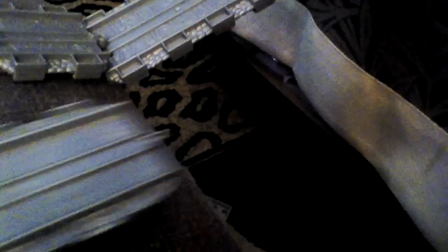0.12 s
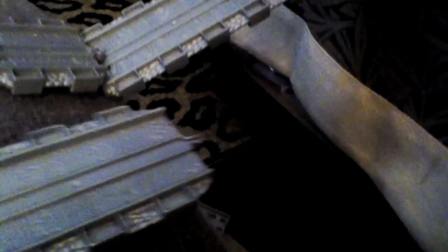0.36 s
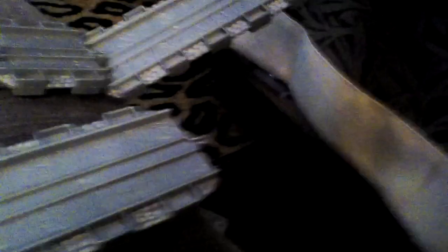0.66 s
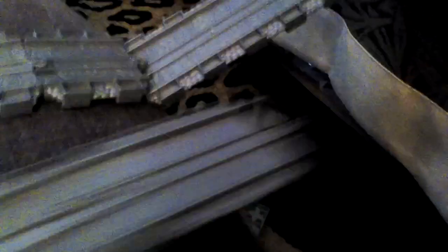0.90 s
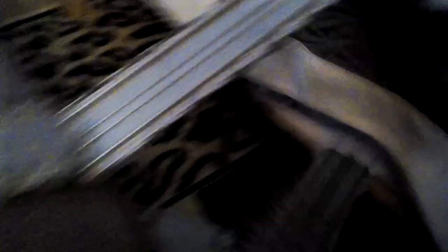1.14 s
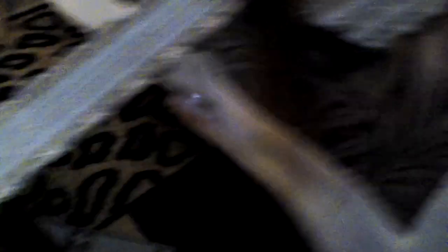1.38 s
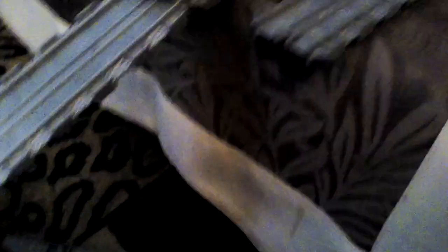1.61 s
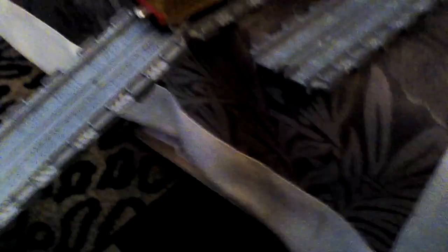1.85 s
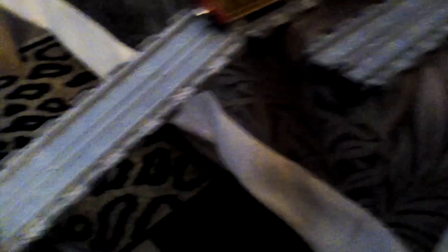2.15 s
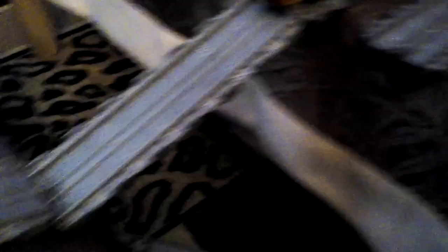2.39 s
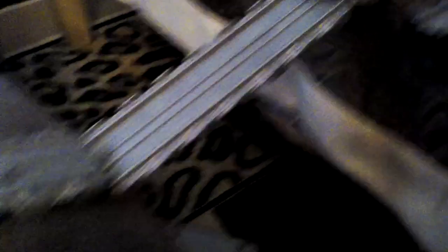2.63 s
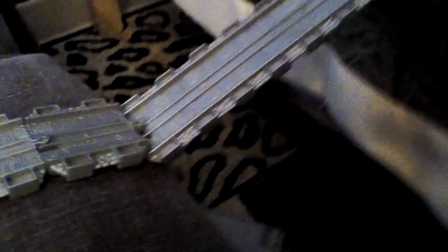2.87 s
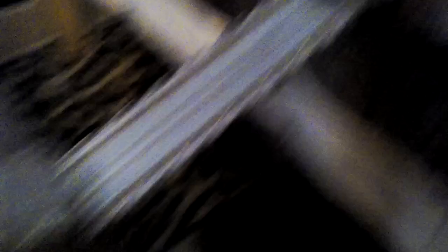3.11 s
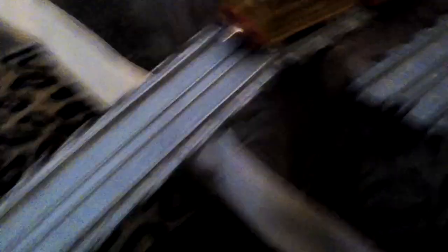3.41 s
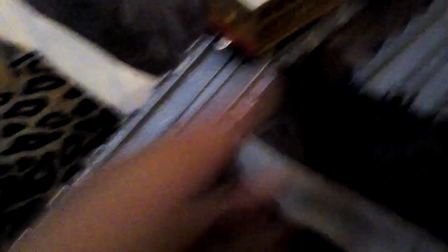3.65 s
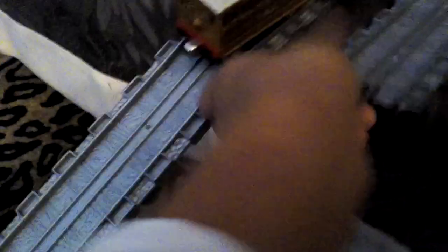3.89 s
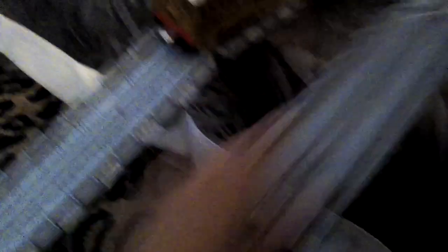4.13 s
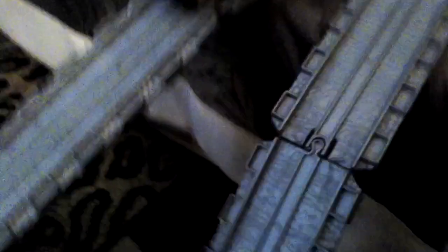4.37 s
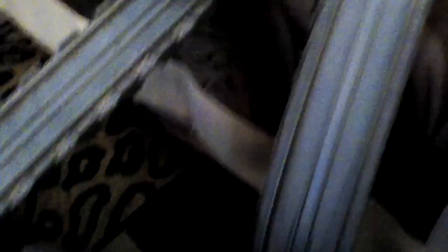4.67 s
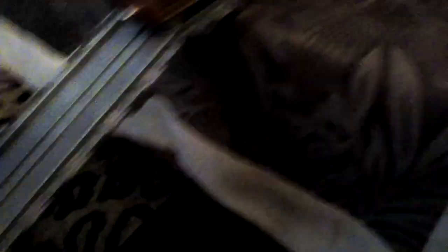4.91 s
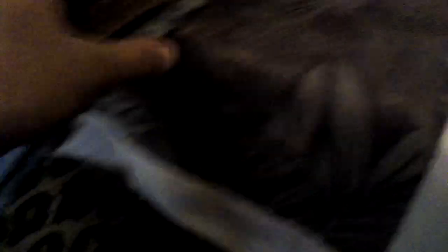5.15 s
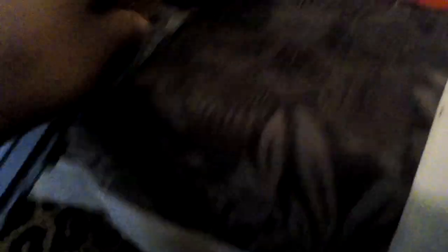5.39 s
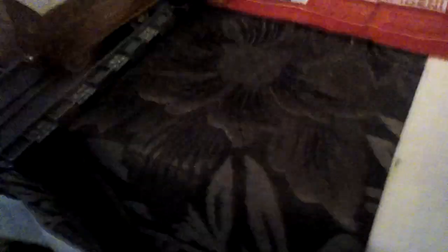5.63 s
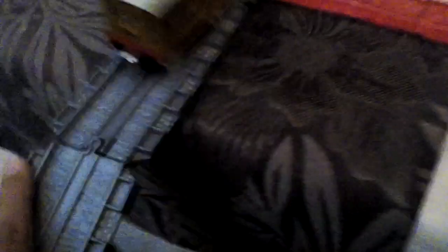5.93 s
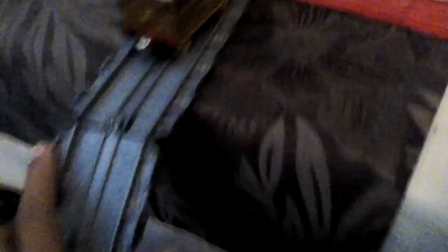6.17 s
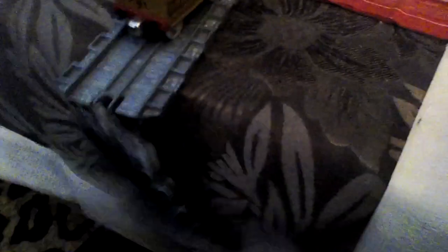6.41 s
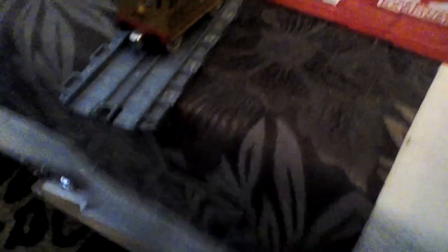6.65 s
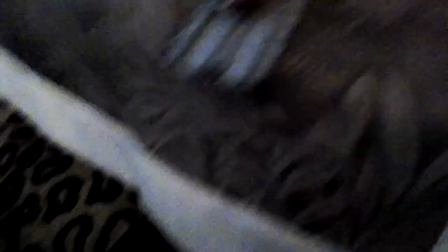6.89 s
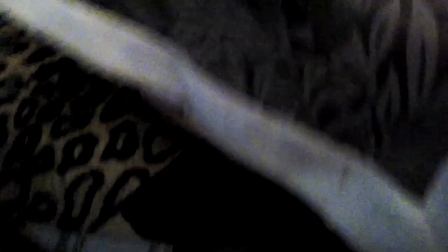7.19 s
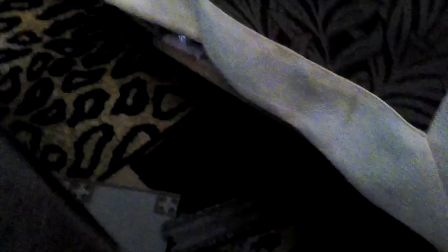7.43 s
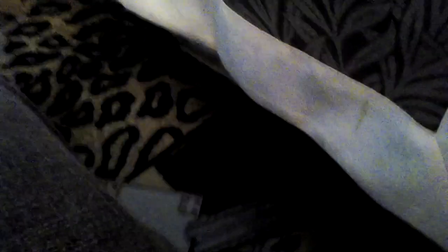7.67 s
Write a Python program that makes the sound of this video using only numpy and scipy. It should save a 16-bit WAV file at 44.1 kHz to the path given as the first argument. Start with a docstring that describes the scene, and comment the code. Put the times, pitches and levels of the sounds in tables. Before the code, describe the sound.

A small room, heard close on a cheap handheld microphone with a faint steady hiss and low rumble. The first second is almost still. Around 1.0 to 1.3 s a light scrape leads into a quick rattle of hard plastic, then a hollow, loud thud at 1.5 s and further knocks until 1.9 s. A lull follows, with only tiny bumps, until fingers scrape and thump the casing at 3.3 to 3.4 s. From 4 s hands and cloth rustle over the rug; a ribbed edge rasps at 4.2 s and a click comes at 4.9 s. A very heavy hollow landing hits at 5.0 s. At 5.4 to 5.6 s scraping ticks end in another thud and sharp clack. Scattered clicks follow around 6 s, knocks at 6.7 s, a bright loud snap at 7.0 s, then dense clatter from 7.2 s, thinning into small clicks over continuing rustle.

```python
"""A small room with a rug: plastic toy track pieces are pulled apart, knocked together and dropped near a
handheld device. Contacts and scrapes are noise and ticks that ring the track's modes; flat landings squeeze air.
Cloth and hands rustle over the rug as patchy coloured noise, with low swells of shifting weight and brief whistles.
Fingers scrape and bump the casing; the small microphone rings near 6 kHz and adds its own hiss."""
import sys
import numpy as np
from scipy import signal
from scipy.fft import rfft, irfft
from scipy.io import wavfile
from scipy.ndimage import uniform_filter1d, map_coordinates

SR = 44100
rng = np.random.default_rng(int(sys.argv[2]) if len(sys.argv) > 2 else 0)


def attenuation_scalar(level_db):
    """Turn a level in dB into a linear amplitude multiplier (20 dB per decade)."""
    decades = np.asarray(level_db, float) / 20
    return 10 ** decades


def store_pcm(level_fs):
    """Save levels as 16-bit WAV."""
    pcm = np.round(np.clip(level_fs, -1, 1) * 32767).astype(np.int16)
    wavfile.write(sys.argv[1], SR, np.atleast_2d(pcm).T)


N = 343539
SPAN = 16384  # samples kept of one hit and its room


def unit(x):
    """Normalisation to an rms of 1."""
    return x / np.sqrt(np.mean(x ** 2) + 1e-20)


def along(points, hz):
    """Linear interpolation of (frequency [Hz], value) points on a logarithmic frequency axis."""
    f, v = np.transpose(points)
    return np.interp(np.log(hz + 1), np.log(f + 1), v)


def causal(db):
    """Minimum-phase response: folding the cepstrum gives the dB curve on an FFT grid its causal phase."""
    ceps = irfft(np.log(attenuation_scalar(db)))
    half = len(ceps) // 2
    ceps[1:half] *= 2
    ceps[half + 1:] = 0
    return np.exp(rfft(ceps))


def add(track, s, sound):
    """Superposition: mixes a sound into the track from time s."""
    part = track[round(s * SR):][:len(sound)]
    part += sound[:len(part)]


def rush(spectrum, patchy_db, wide, long, size=512):
    """Filtered random noise of rms 1 whose gain varies in patches of wide bins by long frames."""
    hz, _, z = signal.stft(rng.standard_normal(N + size), SR, nperseg=size)
    field = uniform_filter1d(rng.standard_normal(z.shape), wide, 0)
    field = uniform_filter1d(field, long, 1)
    gain_db = along(spectrum, hz)[:, None] + patchy_db * unit(field)
    return unit(signal.istft(z * attenuation_scalar(gain_db), nperseg=size)[1][:N])


def hit_grid():
    """Discrete Fourier frequencies [Hz] of one hit."""
    return np.fft.rfftfreq(SPAN, 1 / SR)


# response of the small microphone: (frequency [Hz], gain [dB])
MICROPHONE = [(100, 0), (4000, -11), (5000, -3), (6300, 0), (7200, -12.5), (8200, -22), (10000, -31.5),
              (15000, -46.5), (16500, -45.5)]


def microphone(hz):
    """Transducer resonance: gain [dB] of the capsule at each frequency."""
    return along(MICROPHONE, hz)


# reverberation time of the room: (frequency [Hz], t60 [s])
REVERBERATION = [(100, 0.5), (300, 0.34), (700, 0.2), (2000, 0.27), (5000, 0.3), (13000, 0.15)]
# nominal reflections from ceiling and walls, varied at each hit: (delay [s], level [dB])
REFLECTIONS = [(0.0122, -12.5), (0.013, -18.5), (.0245, -34), (0.0342, -37)]


def room(hit, db, spread=None):
    """Reverberation: early reflections, and a fresh diffuse tail fed by what spreads in all directions."""
    hz, t, z = signal.stft(rng.standard_normal(SPAN), SR, nperseg=256)
    decay = attenuation_scalar(-60 * t / along(REVERBERATION, hz)[:, None])
    tail = signal.istft(z * decay, SR, nperseg=256)[1][:SPAN]
    tail = tail * np.clip(np.arange(SPAN) / SR / 0.013, 0, 1) ** 2  # the diffuse field builds up
    echoes = np.zeros(SPAN)
    for s, wall_db in REFLECTIONS:
        delay = round(s * SR) + rng.integers(0, 20)  # the path shifts from hit to hit
        echoes[delay] = attenuation_scalar(wall_db + rng.normal(0, 0.67))
    diffuse = signal.fftconvolve(hit if spread is None else spread, tail / np.linalg.norm(tail))
    reflected = signal.fftconvolve(hit, echoes)
    return hit + (reflected + attenuation_scalar(db) * diffuse)[:SPAN]


# modes of the plastic track: (frequency [Hz], bandwidth [Hz], relative gain [dB])
TRACK_MODES = [(964, 190, -8.5), (1140, 76, 2), (1540, 2000, -12.5), (2020, 100, -7), (2180, 810, -1),
               (2776, 100, 10.5), (3240, 580, 5.5), (4225, 210, 9.5), (5000, 3400, -9), (6500, 170, -7.5),
               (6674, 170, -4.5), (9140, 750, 10), (11200, 8700, -4.5)]


def ringing(hz, spread_db, favoured_hz=2300):
    """Modal superposition: modes vary in strength, and the struck spot favours those near one frequency."""
    modes = []
    for k, (centre, width, db) in enumerate(TRACK_MODES):
        resonance = 1j * hz * width / (centre * centre - hz * hz + 1j * hz * width)
        modes.append((-1) ** k * attenuation_scalar(db) * resonance)
    log_ratio = np.log(np.array(TRACK_MODES)[:, 0] / favoured_hz)
    boost_db = 15 * np.exp(-(log_ratio / 0.08) ** 2)
    strength = attenuation_scalar(boost_db + rng.normal(0, spread_db, len(modes)))
    return 0.9 + strength @ np.array(modes)  # 0.9 passes the excitation directly


def knock(db, hz, t60, rise):
    """Damped oscillation: a soft blow whose cycles swell and die."""
    t = np.arange(SPAN) / SR
    wave = np.sin(2 * np.pi * hz * t) * (1 - np.exp(-(t / rise) ** 2)) * attenuation_scalar(-60 * t / t60)
    return attenuation_scalar(db) * wave / np.abs(wave).max()


# spectrum of the microphone's own noise: (frequency [Hz], relative level [dB per Hz])
HISS_SPECTRUM = [(300, -2.5), (8000, -4.5), (12000, -5.5), (15400, -5.5)]


def hiss():
    """Electronic self-noise: a faint, steady random hiss at -84.5 dB rms."""
    return attenuation_scalar(-84.5) * rush(HISS_SPECTRUM, patchy_db=1.1, wide=4, long=8)


def slow_waver():
    """Slow random modulation: smooth interpolation between 1.7 random values per second."""
    return map_coordinates(rng.standard_normal(64), [np.arange(N) / SR * 1.7])


# the quiet background's central levels: (rumble [dB], rustle [dB], patchy hiss [dB])
STILL_LEVELS = (-73, -77.5, -74.5)
# low rumble of the room: (frequency [Hz], relative level [dB per Hz])
RUMBLE_SPECTRUM = [(15, -45), (25, -21.5), (98, -1.5), (162, -11), (316, -10), (461, -14.5), (800, -19),
                   (1040, -32), (1760, -120)]
# patchy hiss, strongest near 5.5 kHz: (frequency [Hz], relative level [dB per Hz])
PATCHY_HISS_SPECTRUM = [(2350, -44.5), (4000, -19), (4840, -8.5), (5150, -7), (5550, 4.5), (6810, -9.5),
                        (7080, -24.5), (8140, -30), (10600, -63), (17900, -120)]


def still_room(waver):
    """Filtered random noise: a low rumble, and patchy hiss, strongest near 5.5 kHz, that swells and sinks."""
    rumble, _, patchy_hiss = attenuation_scalar(np.array(STILL_LEVELS))
    return (rumble * rush(RUMBLE_SPECTRUM, patchy_db=1.5, wide=2, long=3, size=4096)
            + patchy_hiss * attenuation_scalar(4.5 * waver) * rush(PATCHY_HISS_SPECTRUM, patchy_db=5.5, wide=5, long=16))


# weight shifting on the rug, each a low swell: (time [s], peak level [dB])
WEIGHT_SHIFTS = [(1.1, -66), (1.32, -62.5), (1.71, -68.5), (2.309, -73), (3.0, -72.5), (3.4, -58.5),
                 (4.15, -67), (4.39, -61), (5.092, -66), (5.489, -55.5), (5.621, -50.5), (6.0, -55),
                 (6.2, -63), (6.8, -51), (7.12, -59), (7.4, -72), (7.56, -62)]
# spectrum of the shifting weight: (frequency [Hz], relative level [dB per Hz])
WEIGHT_SPECTRUM = [(25, -47), (60, -13), (150, -2), (320, -7.5), (600, -17), (1000, -36), (1700, -120)]


def shifting_weight():
    """Energy addition: low noise whose Gaussian swells add in power."""
    t = np.arange(N) / SR
    half_width_s = 0.077  # power falls to 1/e
    power = sum(attenuation_scalar(db) ** 2 * np.exp(-((t - s) / half_width_s) ** 2) for s, db in WEIGHT_SHIFTS)
    return np.sqrt(power) * rush(WEIGHT_SPECTRUM, patchy_db=6.5, wide=2, long=4, size=2048)


# how hard hands, cloth and pieces rub over the rug: (time [s], rustle level [dB])
RUB_EFFORT = [(0, -95), (0.95, -89), (1.1, -76.5), (1.85, -72.5), (2.0, -104.5), (3.22, -81.5),
              (3.36, -69.5), (3.84, -64.5), (4.08, -61), (4.19, -65.5), (4.21, -52), (4.59, -56),
              (4.78, -53), (5.3, -51.5), (5.62, -54), (6.0, -53), (6.27, -57), (6.45, -54.5), (6.83, -53),
              (7.24, -53), (7.79, -55)]
# cloth rustle: (frequency [Hz], relative level [dB per Hz])
RUSTLE_SPECTRUM = [(290, -38), (500, -9), (584, -3), (726, -4), (1180, -0.5), (2410, -5.5), (4400, -6.5),
                   (5720, -34.5), (9680, -120)]
# sizzle in the microphone's ring: (frequency [Hz], relative level [dB per Hz])
SIZZLE_SPECTRUM = [(2500, -40), (4200, -9), (4900, -1), (5600, -1), (6400, 0), (7000, -7), (7500, -22),
                   (8200, -33), (10600, -66)]


def rubbing(waver):
    """Friction noise: one effort drives the rustle and, more steeply, a streaky sizzle."""
    effort_db = np.interp(np.arange(N) / SR, *np.transpose(RUB_EFFORT))
    rustle = np.hypot(attenuation_scalar(STILL_LEVELS[1]), attenuation_scalar(effort_db))
    firm_db = -53.5
    # at a firm rub the sizzle lies 3 dB over the effort; it gains 1.3 dB per dB of effort
    sizzle = attenuation_scalar(firm_db + 3 + 1.3 * (effort_db - firm_db) + 0.5 * waver[::-1])
    return (rustle * rush(RUSTLE_SPECTRUM, patchy_db=4.5, wide=3, long=4, size=2048)
            + sizzle * rush(SIZZLE_SPECTRUM, patchy_db=4.5, wide=3, long=14))


# brief narrow whistles within the rustle: (start [s], end [s], centre [Hz], initial level [dB])
WHISTLE_EVENTS = [(1.245, 1.28, 760, -58), (1.873, 2.034, 4980, -58.5), (4.2, 4.256, 5970, -49),
                  (5.097, 5.162, 5000, -40.5), (5.44, 5.598, 2300, -46.5)]


def whistles():
    """Band-limited noise: narrow bands that start quickly and fade."""
    out = np.zeros(N)
    half_band_hz = 115
    for start, end, hz, db in WHISTLE_EVENTS:
        u = np.linspace(0, 1, round((end - start) * SR))
        band = signal.butter(2, [hz - half_band_hz, hz + half_band_hz], "band", fs=SR, output="sos")
        noise = signal.sosfilt(band, rng.standard_normal(SPAN))[-len(u):]
        envelope = attenuation_scalar(db - 7.8 * u) * np.sin(np.pi * u ** 0.69) ** 0.5
        add(out, start, envelope * unit(noise))
    return out


# fingers shifting on the device:
# (time [s], scrape peak level [dB], bump peak level [dB], bump pitch [Hz], bump t60 [s])
GRIP_SHIFTS = [(3.2957, -22, -28.5, 91, 0.0069), (3.3882, -31, -24, 73.6, 0.11)]


def grip():
    """Structure-borne sound: a growing scrape ends in a snap and a bump, carried by the casing, not the room."""
    out, hz = np.zeros(N), hit_grid()
    body = along([(300, -18), (2000, -8), (5000, 0), (9000, -8), (14000, -14)], hz)
    casing = causal(microphone(hz) + body)
    slip_s = 0.01  # the scrape before a finger lets go
    for s, scrape_db, bump_db, bump_hz, t60 in GRIP_SHIFTS:
        t = np.arange(round(slip_s * SR)) / SR
        slips = rng.laplace(size=len(t)) * attenuation_scalar(22 * t / slip_s)
        scrape = irfft(rfft(slips, SPAN) * casing)
        add(out, s - slip_s, attenuation_scalar(scrape_db) * scrape / np.abs(scrape).max())
        add(out, s - 0.0005, -knock(scrape_db - 3.5, 530, 0.0019, rise=0.00056))  # the finger lets go
        add(out, s, knock(bump_db, bump_hz, t60, rise=0.0021))
    return out


# a ribbed edge dragged across another:
# (start [s], end [s], first level [dB], last level [dB], sharp-edge gain at 10 kHz before the microphone [dB])
EDGE_SCRAPES = [(1.019, 1.17, -73, -69, 7), (1.221, 1.263, -58.5, -72, 1), (4.048, 4.107, -61, -59.5, -35),
                (4.202, 4.383, -51, -61, -4), (5.433, 5.519, -48, -43.5, -15),
                (5.524, 5.601, -42.5, -48, -7.5), (7.317, 7.39, -35.5, -74, -15)]


def scrapes():
    """Random impulse excitation: dense ticks of very unequal size ring the track while the edge slides."""
    out, hz = np.zeros(N), hit_grid()
    ticks_per_s = 1300
    for start, end, first_db, last_db, edge_db in EDGE_SCRAPES:
        n = round((end - start) * SR)
        impulses = (rng.random(n) < ticks_per_s / SR) * rng.laplace(size=n)
        colour = along([(400, -15), (1500, 3), (6000, 4.5), (10000, edge_db)], hz) + microphone(hz)
        ticks = irfft(rfft(impulses, SPAN) * ringing(hz, 1) * causal(colour))[:n]
        slide = unit(ticks) * attenuation_scalar(np.linspace(first_db, last_db, n))
        add(out, start, room(np.pad(slide, (0, SPAN - n)), -2))
    return out


# flat landings, and faint low bumps of the grip: (time [s], main pulse level [dB], pitch [Hz], swell [s])
LANDINGS_AND_BUMPS = [(1.088, -44, 200, 0.0024), (1.4656, -9, 465.5, 0.0024), (1.513, -25.5, 568, 0.0036),
                      (1.736, -22.5, 395, 0.0023), (1.891, -28, 513, 0.0029), (2.272, -44, 208.5, 0.0024),
                      (2.296, -47, 202, 0.0028), (2.986, -61.5, 104.9, 0.0081), (3.141, -47.5, 148, 0.0038),
                      (3.22, -51.5, 118.4, 0.0057), (4.381, -48, 323, 0.0061), (5.033, -3.5, 506, 0.0022),
                      (5.606, -8.5, 487, 0.0028), (6.768, -28.5, 325, 0.0063), (7.328, -19, 342, 0.0049)]


def thuds():
    """Air displacement: a flat landing squeezes air out in a few cycles and rings on; faint bumps share the form."""
    out, t = np.zeros(N), np.arange(SPAN) / SR
    for s, db, hz, swell in LANDINGS_AND_BUMPS:
        push = (t / swell * np.exp(1 - t / swell)) ** 5.7
        squeeze = push * np.cos(2 * np.pi * hz * (t - 0.9 * swell))  # a crest at 0.9 of the swell
        squeeze = squeeze - push * squeeze.sum() / push.sum()  # as much air flows back as left
        ring = knock(-23.5, 1.07 * hz, t60=62 / hz, rise=0.006)  # 62 periods of the blow's pitch
        add(out, s, room(attenuation_scalar(db) * (ring - squeeze), -14.5))
    return out


# plastic on plastic, and two faint ticks close behind the click at 7.484:
# (time [s], direct peak level [dB], hollow part [relative dB], middle part [relative dB], favoured mode [Hz])
CONTACTS = [(1.3006, -15, -26, -15, 4225), (1.3043, -15.5, -7, -22.5, 4200), (1.3101, -14, -30, -13, 2900),
            (1.3142, -17.5, -19.5, -23, 4460), (1.3179, -20, -29, -8, 926), (1.467, -31, 0, -8, 880),
            (1.4966, -22, -7.5, -20, 778), (1.541, -37.5, -2, -3, 920), (1.6586, -31, -3, -10, 4200),
            (1.6667, -27.5, 0, -16, 820), (1.6841, -33, 0, -16, 1078), (1.735, -13.5, -2.5, -9, 1316),
            (1.746, -15.5, -8, -5, 724), (1.8911, -32, 4, -4, 1020), (3.93, -38, -42, -32, 1025),
            (3.9823, -42, -29, -5, 1010), (4.7091, -35.5, -38, -36, 4310), (4.774, -36, 1.5, -12.5, 1214),
            (4.8823, -17.5, -5.5, -1, 1128), (5.033, -24.5, 9, 6.5, 703), (5.245, -25.5, -4, -16.5, 3100),
            (5.453, -34.5, -2, -42, 2260), (5.495, -22, -23, -4, 2300), (5.5345, -26, -23, 4.5, 2320),
            (5.5529, -28, -44, -13, 4000), (5.5685, -33, -28, -11, 9140), (5.5789, -22.5, -8, 1, 2290),
            (5.592, -28, -10, -9, 9140), (5.6088, -18, 9.5, -11, 748), (5.6247, -10, -4.5, -10, 3430),
            (5.6279, -5.5, -30, -6.5, 3410), (5.712, -25.5, -12, -11, 3240), (5.756, -31, 2, 0, 1870),
            (5.9619, -13.5, -18, -15.5, 2630), (5.9665, -24, 1, 7, 3030), (6.0536, -18, -14, -3, 2150),
            (6.1257, -30.5, -10.5, -4, 2970), (6.1951, -35, -15, -2, 2400), (6.2129, -29.5, -22, -8, 2230),
            (6.661, -12, 2, -2, 899), (6.7638, -15.5, 5, -6.5, 860), (6.769, -11.5, -7, -5.5, 950),
            (6.9254, -33, -10.5, -0.5, 2140), (7.0273, -1.5, -18, -23.5, 6500),
            (7.168, -18, -12.5, -14.5, 1050), (7.2227, -20.5, -8, -13.5, 3070), (7.227, -19, -14, -14, 900),
            (7.3198, -18, 0, -55, 920), (7.325, -11, -12, 5.5, 870), (7.3294, -13, 7.5, -7, 710),
            (7.3504, -24, -20, -25, 2776), (7.3742, -12.5, -6, 2.5, 1550), (7.4075, -16, -14, -12.5, 3300),
            (7.463, -30, -37, -16, 1400), (7.4742, -25, -6, 2.5, 3570), (7.4841, -13.5, -23, -10.5, 3230),
            (7.4972, -34, -21, -25, 3240), (7.516, -35, -14, -11, 3240), (7.5635, -27, 3, 1, 1245),
            (7.583, -27.5, -7, -12, 3070), (7.6285, -21, -3, 6, 2460), (7.6398, -19.5, -21, -9.5, 2300),
            (7.658, -26, -28, -6, 3960), (7.6866, -24, -13, -6.5, 4000), (7.7693, -32.5, -12, 3, 993)]
# how bright the contacts' sharpest treble is over time: (time [s], treble gain [dB])
CONTACT_BRIGHTNESS = [(1.3, 3), (1.5, 7), (1.74, 19.5), (1.9, -23.5), (4.7, -22), (4.88, 17), (5.63, 6.5),
                      (5.76, -2.5), (6.25, -29), (6.7, -4), (7.03, -4.5), (7.33, 6.5), (7.45, -12.5),
                      (7.63, 11.5), (7.7, -24)]


def clicks():
    """Impact excitation: a rattle that swells within a millisecond, with a snap at 1.1 ms, rings the modes."""
    out, t, hz = np.zeros(N), np.arange(SPAN) / SR, hit_grid()
    for s, db, hollow_db, middle_db, favoured_hz in CONTACTS:
        rattle_t60 = 0.015 * attenuation_scalar(0.076 * db)  # seconds; weaker blows rattle more briefly
        rattle = attenuation_scalar(-60 * t / rattle_t60) * np.clip(t / 0.00082, 0.3, 1) * rng.standard_normal(SPAN)
        rattle[round(0.0011 * SR)] = 5  # the snap
        brightness_db = np.interp(s, *np.transpose(CONTACT_BRIGHTNESS))
        edge_db = -11 + 0.6 * db + brightness_db  # harder blows have a sharper edge
        colour = [(40, hollow_db - 62), (150, hollow_db - 12.0), (500, hollow_db - 10.5),
                  (900, hollow_db + 0.5), (2600, middle_db - 5), (4700, middle_db - 7.5),
                  (6000, -15), (10000, edge_db)]
        smooth = causal(along(colour, hz) + microphone(hz))
        hit = irfft(rfft(rattle) * ringing(hz, 2.6, favoured_hz) * smooth)
        hit = attenuation_scalar(db) * hit / np.abs(hit).max()
        spread = irfft(smooth * ringing(hz, 0.78, favoured_hz))  # over all directions the modes even out
        spread = spread * np.linalg.norm(hit) / np.linalg.norm(spread)
        add(out, s, room(hit, -10.0, spread))
    return out


def scene():
    """Superposition of all sources at one microphone."""
    waver = slow_waver()
    background = still_room(waver) + shifting_weight() + rubbing(waver) + whistles()
    return (background + grip() + scrapes() + thuds() + clicks())[None]


def low_pass(x):
    """Removes everything above the highest recorded frequency."""
    return signal.sosfilt(signal.butter(12, 15600, fs=SR, output="sos"), x)


def record(dry):
    """Transduction limits: the device cuts the deepest bass, adds a faint hiss and clips at full scale."""
    bass_cut = signal.butter(2, 55, "high", fs=SR, output="sos")
    mix = np.clip(signal.sosfilt(bass_cut, dry) + hiss(), -1, 1)
    return low_pass(mix)


dry = scene()
out = record(dry)
store_pcm(out)
```